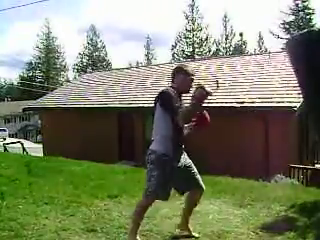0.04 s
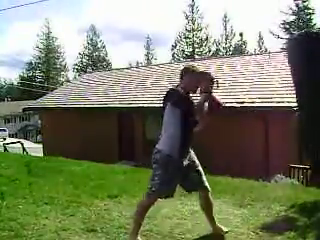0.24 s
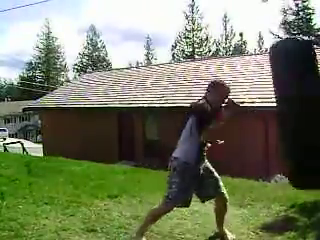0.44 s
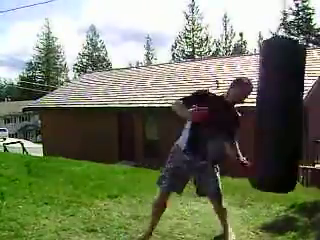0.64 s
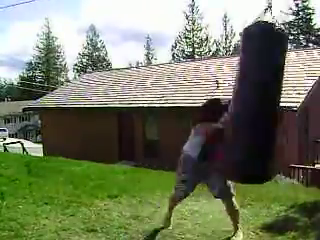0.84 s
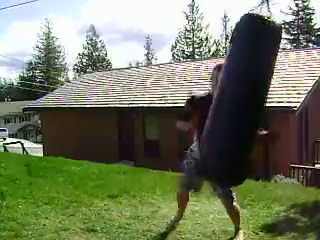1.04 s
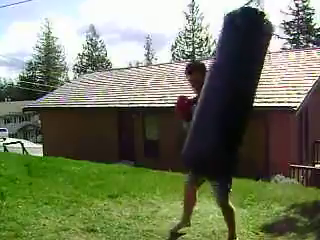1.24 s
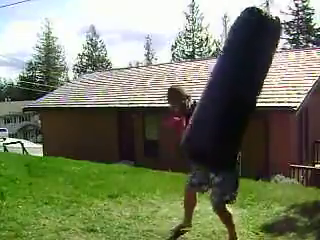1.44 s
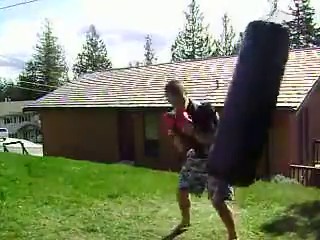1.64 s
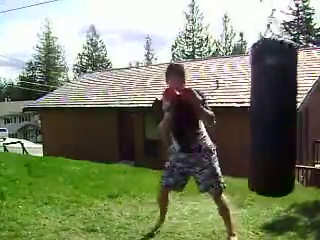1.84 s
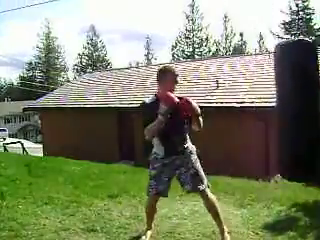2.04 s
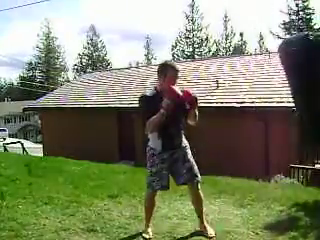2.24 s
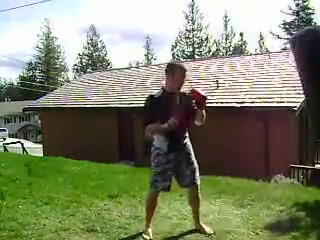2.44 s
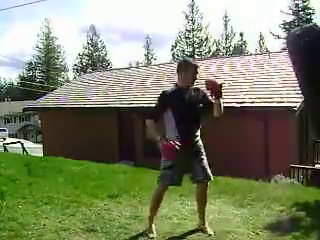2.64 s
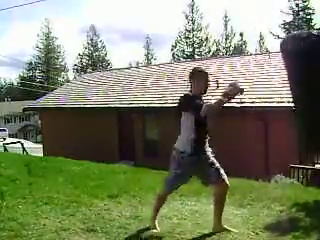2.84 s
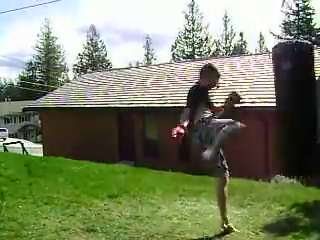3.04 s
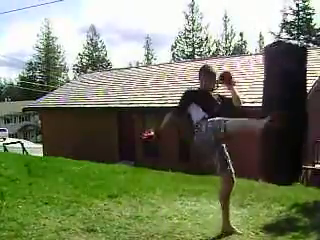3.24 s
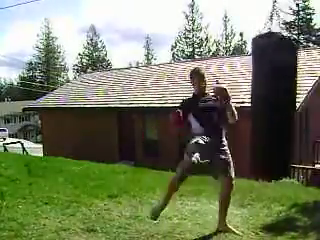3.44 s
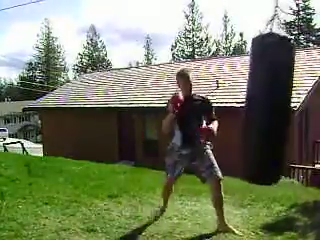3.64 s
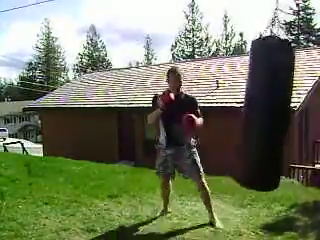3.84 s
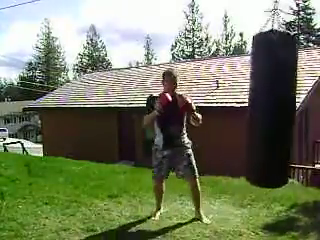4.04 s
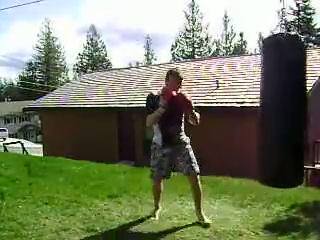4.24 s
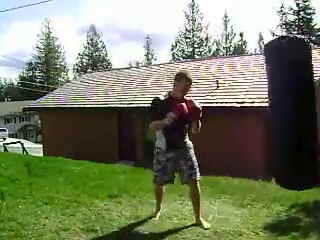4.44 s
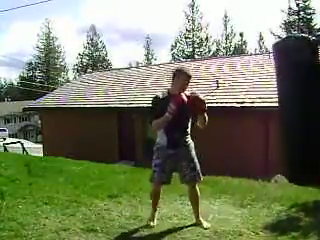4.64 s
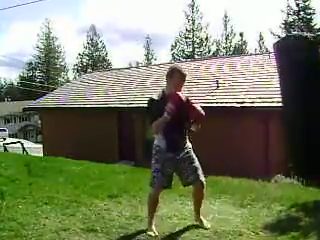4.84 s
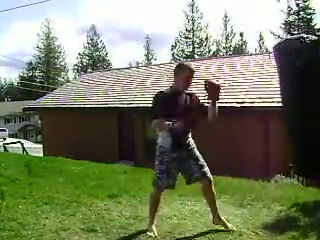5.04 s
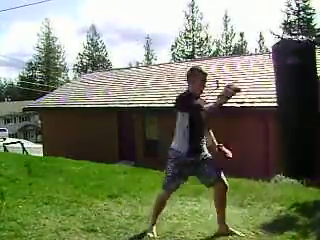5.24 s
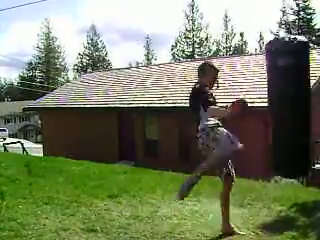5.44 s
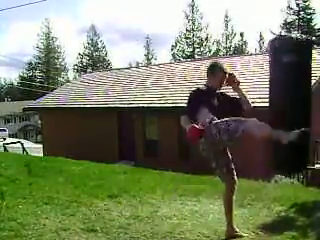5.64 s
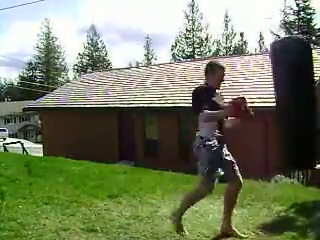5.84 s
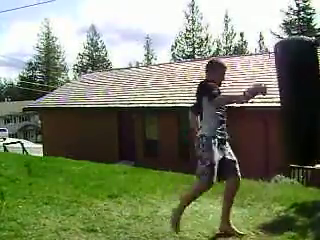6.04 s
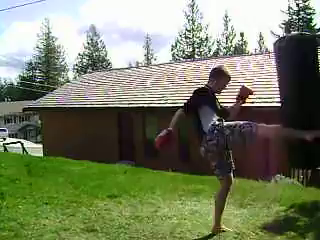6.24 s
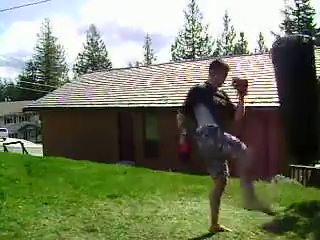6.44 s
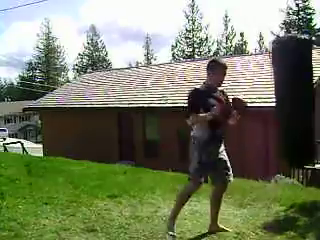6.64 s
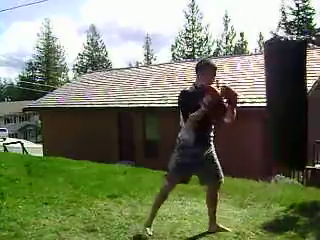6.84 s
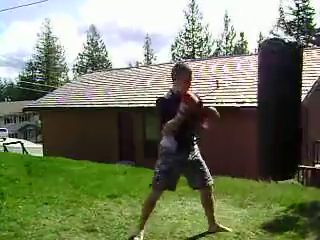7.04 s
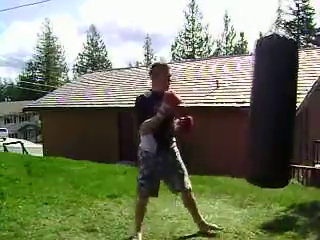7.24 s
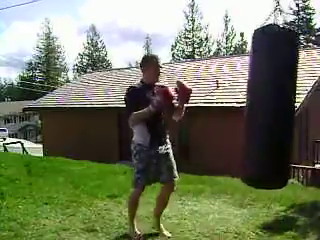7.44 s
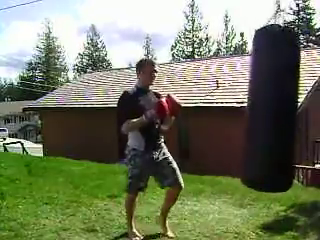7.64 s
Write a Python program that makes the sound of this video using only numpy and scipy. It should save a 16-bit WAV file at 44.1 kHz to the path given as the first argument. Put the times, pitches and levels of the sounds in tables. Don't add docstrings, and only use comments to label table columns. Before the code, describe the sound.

Irregular punches and kicks thud and slap against a heavy hanging bag outdoors, its chain rattling and creaking while wind buffets the microphone.

```python
import sys
import numpy as np
from scipy import signal
from scipy.io import wavfile

SR = 44100
rng = np.random.default_rng(int(sys.argv[2]) if len(sys.argv) > 2 else 0)


def store_wav(level_fs):
    pcm = np.round(np.clip(np.atleast_2d(level_fs), -1, 1) * 32767)
    wavfile.write(sys.argv[1], SR, pcm.T.astype(np.int16))


def nominal_scale(level):
    x = np.asarray(level, float) / 20
    return 10 ** x


N = 339992

# pitch_hz, width_hz, level_db
SKIN_MODES = [(643, 220, -2), (950, 267, 5.5), (1320, 720, -0.5), (1765, 460, 0.5)]
# pitch_hz, width_hz, level_db
CRACK_MODES = [(2960, 270, -9.5), (5330, 5300, -6.5)]


def rms_one(x):
    return x / np.sqrt(np.mean(x ** 2) + 1e-20)


def drift(rate_hz):
    r = np.exp(-40 * np.pi * rate_hz / SR)
    noise = rng.standard_normal(N // 20 + 2002)
    slow = signal.lfilter([1], [1, -2 * r, r * r], noise)[2000:]
    return np.interp(np.arange(N) / 20, np.arange(len(slow)), rms_one(slow))


def resonate(x, hz, width_hz):
    r = np.exp(-np.pi * width_hz / SR)
    rise = np.array([1, 0, -1]) * (1 - r * r) / 2
    return signal.lfilter(rise, [1, -2 * r * np.cos(2 * np.pi * hz / SR), r * r], x + 1e-18)


def through(x, modes):
    out = 0
    for k, (hz, width_hz, db) in enumerate(modes):
        out = out + (-1) ** k * nominal_scale(db) * resonate(x, hz, width_hz)
    return out


def grains(spread_db):
    size_db = spread_db * np.minimum(rng.exponential(1, N), 6)
    return rms_one(nominal_scale(size_db) * rng.choice([-1, 1], N))


def band_pass(x, order, low_hz, high_hz):
    return signal.sosfilt(signal.butter(order, [low_hz, high_hz], "band", fs=SR, output="sos"), x)


def banded(spectrum, spread_db, lump_db, lump_hz, patch_db):
    hz, db = np.transpose(spectrum)
    edges = np.geomspace(hz[0], hz[-1], int(3 * np.log2(hz[-1] / hz[0])) + 2)
    sources = [grains(spread_db), grains(spread_db)]
    out = 0
    for k, (low, high) in enumerate(zip(edges, edges[1:])):
        level_db = np.interp(np.log(low * high) / 2, np.log(hz), db)
        patches = nominal_scale(level_db + patch_db * drift(lump_hz / 2))
        out = out + band_pass(sources[k % 2], 2, low, high) * patches
    return rms_one(out * nominal_scale(lump_db * drift(lump_hz)))


def dying(times, level_db, t60_s, rise_s, hold_s=0):
    out = np.zeros(N)
    for s, db, fall, hold in np.broadcast(times, level_db, t60_s, hold_s):
        at = round(s * SR)
        t = np.arange(min(round((1.5 * fall + hold) * SR), N - at)) / SR
        fall_db = 60 * np.maximum(t - hold, 0) / fall
        out[at:at + len(t)] += nominal_scale(db - fall_db) * (1 - np.exp(-t / rise_s))
    return out


def gusts():
    # time_s, rumble_db
    strength = [(0.0, -44), (0.64, -39.5), (0.78, -35.5), (1.3, -35.5), (1.99, -35.5), (2.5, -37.5),
                (2.62, -33), (3.04, -35), (3.1, -44.5), (3.3, -35.5), (3.78, -38.5), (3.86, -30),
                (4.6, -34.5), (5.1, -45.5), (5.9, -32), (6.6, -36), (7.36, -39), (7.45, -46)]
    s, db = np.transpose(strength)
    rumble_db = np.interp(np.arange(N) / SR, s, db)
    buffet_db = -40.5 + 1.64 * (rumble_db + 37)
    return rumble_db, buffet_db


def wind(rumble_db, buffet_db):
    # pitch_hz, level_db (per Hz)
    rumble_tone = [(11, -27.5), (18, 1.5), (65, 5), (129, 4), (222, -3), (260, -4.5), (340, -13.5),
                   (570, -120)]
    # pitch_hz, level_db (per Hz)
    buffet_tone = [(110, -26.5), (180, -8), (330, -7), (388, -9.5), (651, -12.5), (800, -15.5),
                   (1040, -30.5), (1760, -120)]
    # start_s, level_db (over the gust)
    eddies = [(0.23, 14), (0.85, 5), (1.37, -1), (1.571, 5.5), (2.03, 11), (2.281, 12), (2.47, 8),
              (2.6, 11.5), (2.83, 8), (2.949, 9), (3.04, 11.5), (3.41, -2), (3.94, 6), (4.03, -1),
              (4.36, -14), (4.95, 9), (5.93, 3), (6.52, 9), (6.88, -2), (7.299, 8.5)]
    rumble = banded(rumble_tone, 2.5, lump_db=2.5, lump_hz=16.0, patch_db=1.0)
    buffet = banded(buffet_tone, 1.6, lump_db=2.0, lump_hz=35.0, patch_db=1.5)
    s, eddy_db = np.transpose(eddies)
    bursts = 1 + dying(s, eddy_db, t60_s=0.14, rise_s=0.0052)
    return bursts * (nominal_scale(rumble_db - 2.0) * rumble + nominal_scale(buffet_db) * buffet)


def shaking(lasts, steady):
    # start_s, level_db, hold_s, t60_s
    shakes = [(0.45, -43, 0.087, 0.67), (0.55, -41.5, 0.25, 0.67), (0.745, -37, 0.059, 0.81),
              (1.165, -32, 0.21, 0.47), (1.788, -43.5, .05, 1), (2.006, -44, 0.12, 0.71),
              (2.86, -42.5, .07, 0.15), (3.16, -26.5, .12, 1), (3.588, -41.5, .07, 0.84),
              (3.813, -49.5, 0.091, 0.36), (3.999, -42, 0.23, 1), (4.53, -39, 0.037, 0.98),
              (5.593, -26.5, .04, 0.64), (5.673, -29, 0.065, 0.67), (6.037, -39.5, 0.032, 0.33),
              (6.119, -34.5, 0.067, 0.93), (1.617, -43, 0.12, 0.2), (6.57, -38, 0.034, 0.13),
              (6.304, -24, 0.087, 0.75), (7.03, -43.5, 0.044, 0.15), (7.28, -49.5, 0.098, 0.81),
              (7.547, -41.5, .05, 0.34)]
    s, db, hold_s, t60_s = np.transpose(shakes)
    return np.hypot(steady, dying(s, db, lasts * t60_s, 0.0042, lasts * hold_s))


def rattle():
    # pitch_hz, level_db (per Hz)
    rattle_tone = [(900, -21.5), (1670, -4.5), (2790, -8.5), (3250, -9), (5070, -9), (5690, -7),
                   (6300, -13), (7500, -41)]
    clicks = banded(rattle_tone, 5.2, lump_db=1.5, lump_hz=60.0, patch_db=1.35)
    return shaking(0.84, steady=nominal_scale(-50)) * clicks


def rustle(buffet_db):
    # pitch_hz, level_db (per Hz)
    rustle_tone = [(260, -22.5), (450, -1.5), (938, 3.5), (1150, 2), (1360, -7), (1810, -6), (2800, -24.5),
                   (4200, -40.5)]
    traffic, leaves = nominal_scale(-40), nominal_scale(buffet_db - 7.5)
    rubbing = banded(rustle_tone, 3.07, lump_db=2.0, lump_hz=30.2, patch_db=1.5)
    return shaking(0.81, steady=np.hypot(traffic, leaves)) * rubbing


def crackle():
    per_s = 90 * nominal_scale(4 * drift(5))
    born = rng.random(N) < per_s / SR
    size = nominal_scale(3.5 * np.minimum(rng.exponential(1, N), 4))
    snaps = signal.lfilter([1], [1, -.985], born * size) * rng.standard_normal(N)
    return nominal_scale(-53) * rms_one(band_pass(snaps + 1e-18, 1, 700, 4500))


def ticks():
    # start_s, peak_db, pitch_hz
    taps = [(0.201, -12, 1050), (0.25, -15, 950), (0.515, -10, 860), (0.636, -6.5, 1120), (0.687, -8, 900),
            (0.783, -7.5, 1090), (0.991, -12.5, 912), (1.033, -13, 1210), (1.104, -26, 990),
            (1.335, -13, 1010), (1.461, -10.5, 1150), (1.593, -8.5, 910), (1.724, -14, 1020),
            (1.848, -3.5, 830), (3.635, -16.5, 4870), (3.947, -19, 969), (3.999, -22, 810),
            (4.028, -6, 1030), (4.066, -20, 802), (4.612, -12, 1150), (4.645, -6.5, 1300),
            (4.755, -14, 1050), (5.075, -10.5, 1550), (5.224, -12.5, 1180), (5.727, -1, 1290),
            (5.808, -10, 4400), (6.379, -6, 1200), (7.27, -13.5, 1360), (7.313, -10.5, 1060),
            (7.598, -7, 765)]
    out, length = np.zeros(N), round(0.045 * SR)
    fade = nominal_scale(-60 * np.arange(length) / SR / 0.055)
    for s, db, hz in taps:
        puff = rng.standard_normal(length) * fade
        broad = through(puff, SKIN_MODES[1:] + CRACK_MODES)
        ring = resonate(puff, hz, 0.15 * hz)
        at = round(s * SR)
        out[at:at + length] += nominal_scale(db + 2.0) * (0.2 * broad / np.abs(broad).max() + 0.561 * ring)
    return out


def smacks():
    # start_s, peak_db, pitch_hz
    touches = [(0.444, -30, 1300), (0.7389, -3, 674), (0.7528, -11, 1100), (1.1559, 8.5, 600),
               (1.17, 5, 2020), (1.175, -3, 1990), (1.272, -5.5, 1400), (1.794, -10, 1500),
               (3.1623, -0.5, 700), (3.505, -18, 1300), (4.333, -7.5, 1200), (4.341, -6, 1100),
               (4.528, -10, 1000), (4.541, -6.5, 1200), (5.588, -5.5, 1200), (5.668, -7, 700),
               (5.943, -14.5, 250), (5.962, -12, 220), (6.149, -8.5, 1300), (6.3073, 6, 800),
               (6.344, -4, 900), (7.573, -17, 1100), (7.272, -21, 1400), (5.075, -25, 1490),
               (0.201, -27, 1100), (4.754, -23, 1296), (6.119, -21, 1204)]
    out = np.zeros(N)
    for s, db, hz in touches:
        cycles = np.arange(round(4 * SR / hz)) * hz / SR
        fade_db = 60 * cycles / 3.2
        at = round(s * SR)
        out[at:at + len(cycles)] += nominal_scale(db + 5.5 - fade_db) * np.sin(2 * np.pi * cycles)
    return out


def contacts():
    # start_s, slap_db (peak), push_db, crack_db, t60_s (slap)
    hard = [(0.538, -14.5, -34.5, -25, 0.17), (0.7392, -14.5, -17.5, -24, 0.035),
            (0.749, -15.5, -27, -20, 0.033), (1.155, -10, -14.5, -10, 0.1),
            (1.168, -2.5, -44.5, -13, 0.028), (1.271, -9, -44, -14, 0.038), (1.786, -4, -45, -14.5, 0.012),
            (1.793, -15, -29.5, -27, 0.14), (1.835, -14, -19.5, -15, 0.021), (3.162, 5.5, -5, -13.5, 0.06),
            (3.176, -4, -22, -14.5, 0.17), (4.332, -13, -39, -23.5, 0.044), (4.339, -10, -30, -18, 0.046),
            (4.527, -13.5, -28.5, -22, 0.067), (4.537, -12.5, -34, -19.5, 0.074),
            (5.587, -14.5, -23.5, -20, 0.065), (5.593, -3, -21, -22, 0.12), (5.667, -20, -18.5, -13, 0.041),
            (5.935, -27, -25.5, -47, 0.047), (5.959, -20, -29, -39, 0.088), (6.307, 0, -15, -16.5, 0.072),
            (6.319, 0, -14.5, -17.5, 0.038)]
    # start_s, slap_db (peak), t60_s (slap)
    brushes = [(0.443, -19, 0.034), (3.148, -24, 0.05), (3.506, -16.5, 0.11), (3.602, -25.5, 0.12),
               (4.325, -22, 0.034), (4.56, -15.5, 0.04), (4.833, -22, 0.16), (6.12, -20, 0.22),
               (6.566, -24.5, 0.17), (6.594, -18, 0.069), (7.572, -21.5, 0.18)]
    light = [(s, db, db - 20, db - 11, t60_s) for s, db, t60_s in brushes]
    return np.transpose(hard + light)


def blows():
    # pitch_hz, width_hz, level_db
    body_modes = [(45, 20, 15), (243, 50, -10)]
    s, slap_db, push_db, crack_db, t60_s = contacts()
    slap = rms_one(through(grains(2.7), SKIN_MODES)) * dying(s, slap_db - 5.0, t60_s, 0.00044)
    crack = rms_one(through(grains(2.9), CRACK_MODES)) * dying(s, crack_db - 2.0, 0.8 * t60_s, 0.00014)
    force = np.zeros(N)
    force[np.round(s * SR).astype(int)] = -nominal_scale(push_db + 39.0)
    padding = np.hanning(round(0.0013 * SR))
    push = through(np.convolve(force, padding / padding.sum())[:N], body_modes)
    shudder = rms_one(through(grains(1.4), [(294, 346, 0.0), (110, 270, -7.5)]))
    return slap + crack + push + shudder * dying(s, push_db + 3.0, 2.05 * t60_s, 0.006)


def creaks():
    # start_s, length_s, level_db, pitch_hz
    rubs = [
        (2.019, .16, -31.5, 1410),
        (2.124, .16, -37, 1760),
        (3.25, 0.061, -40, 1880),
        (3.296, 0.13, -28, 2850),
        (3.322, 0.1, -28, 3570),
        (3.386, 0.042, -24.5, 2740),
        (3.397, 0.082, -31, 2580),
        (0.555, .08, -24.5, 950),
    ]
    out = np.zeros(N)
    for s, length_s, db, hz in rubs:
        swell = np.sqrt(np.hanning(round(length_s * SR)))
        rub = rms_one(resonate(rng.standard_normal(SR // 4), hz, 160))
        at = round(s * SR)
        out[at:at + len(swell)] += nominal_scale(db - 6.5) * swell * rub[-len(swell):]
    return out


def scene():
    rumble_db, buffet_db = gusts()
    background = wind(rumble_db, buffet_db) + rattle() + rustle(buffet_db) + crackle()
    return (background + ticks() + smacks() + blows() + creaks())[None]


def band_limit(x):
    return signal.sosfilt(signal.butter(12, 16560, fs=SR, output="sos"), x)


def record(dry):
    overload = 0.71
    narrow = signal.sosfilt(signal.cheby2(12, 60, 6425, fs=SR, output="sos"), dry)
    flat = np.clip(narrow, -overload, overload)
    spill = signal.sosfilt(signal.butter(1, 15000, fs=SR, output="sos"), flat - narrow)
    return band_limit(narrow + spill)


dry = scene()
out = record(dry)
store_wav(out)
```